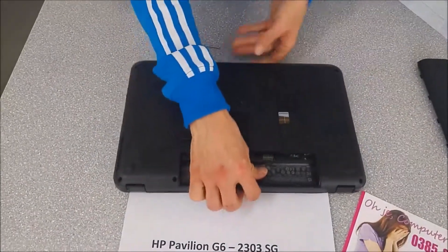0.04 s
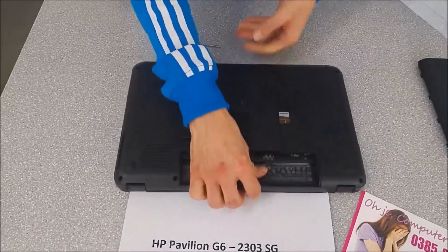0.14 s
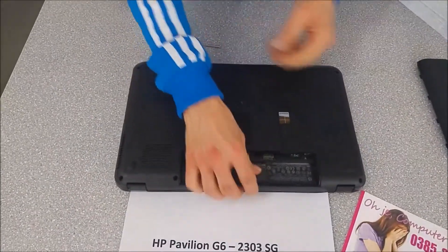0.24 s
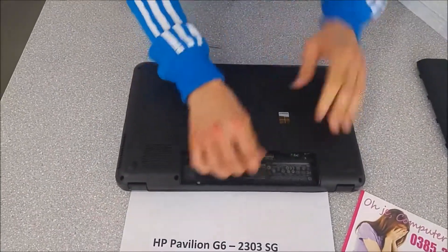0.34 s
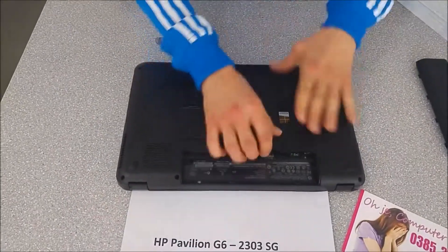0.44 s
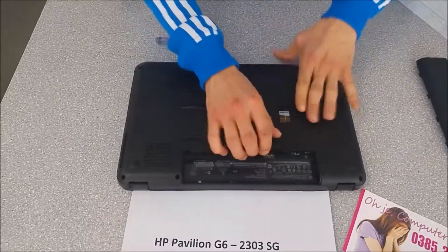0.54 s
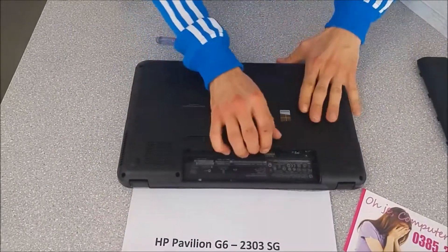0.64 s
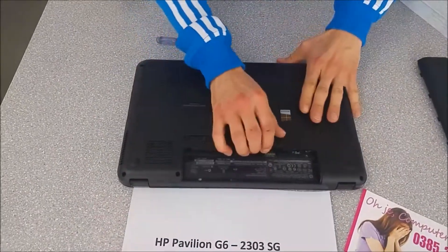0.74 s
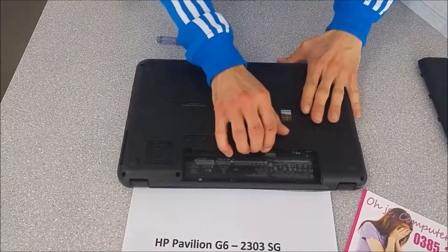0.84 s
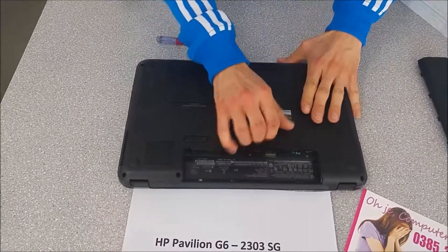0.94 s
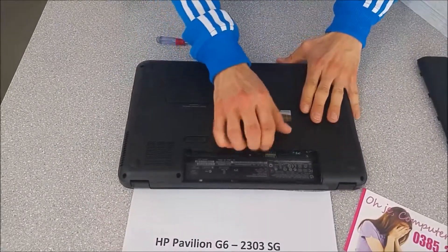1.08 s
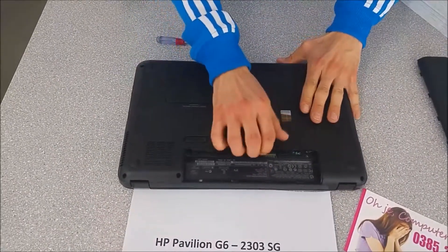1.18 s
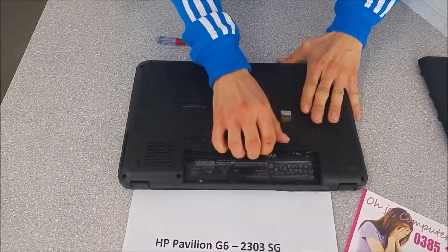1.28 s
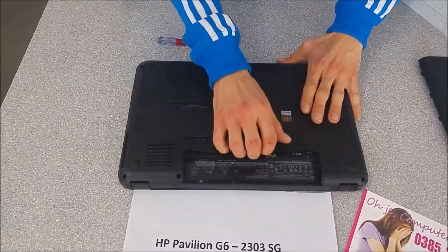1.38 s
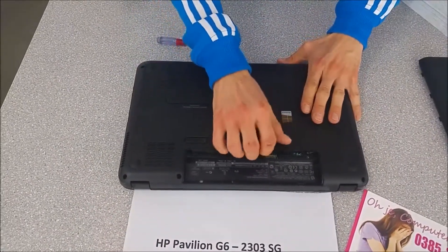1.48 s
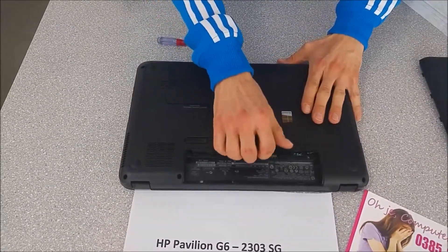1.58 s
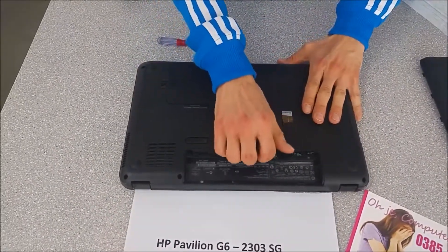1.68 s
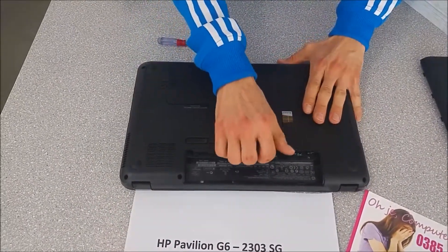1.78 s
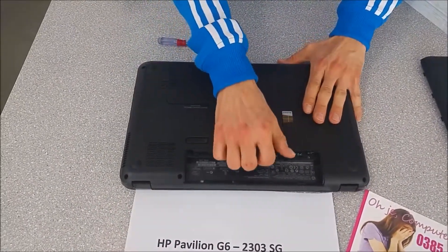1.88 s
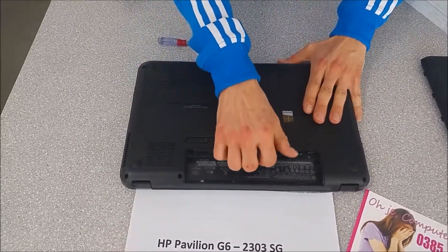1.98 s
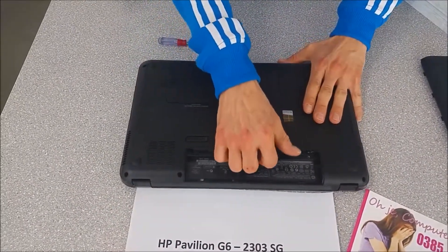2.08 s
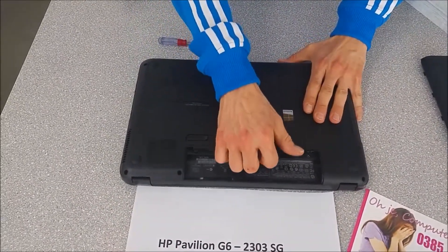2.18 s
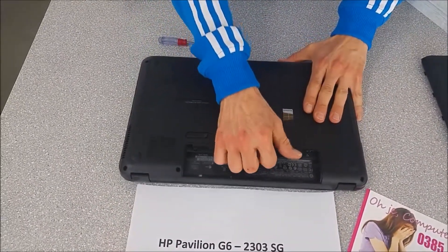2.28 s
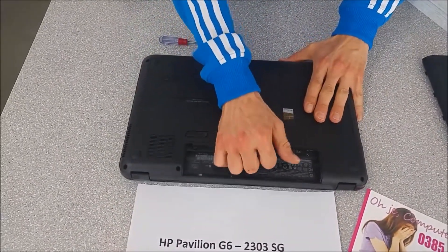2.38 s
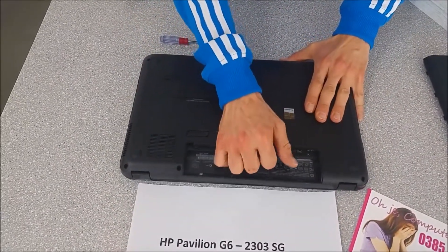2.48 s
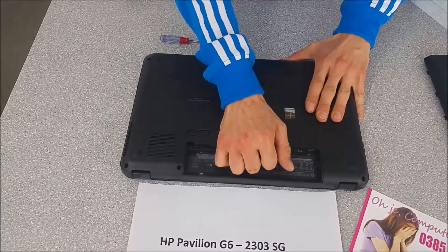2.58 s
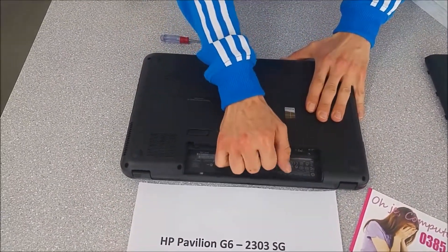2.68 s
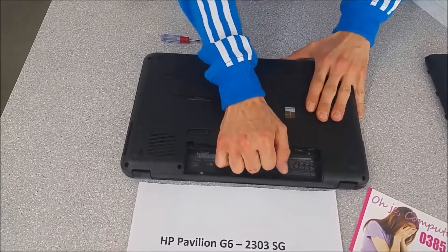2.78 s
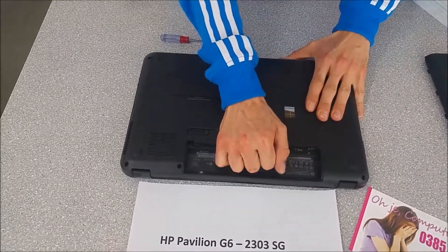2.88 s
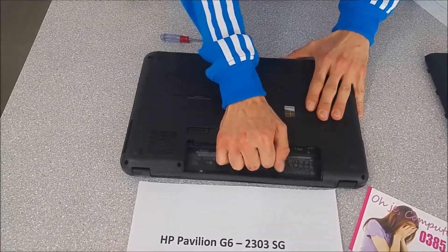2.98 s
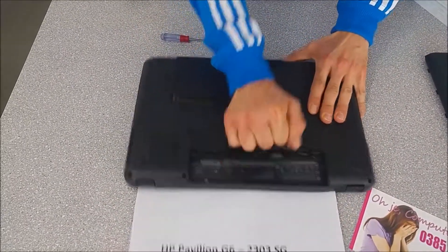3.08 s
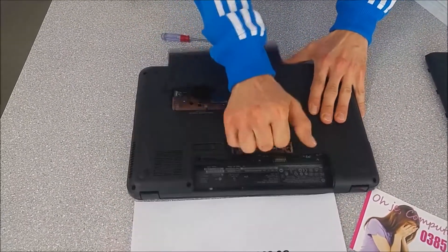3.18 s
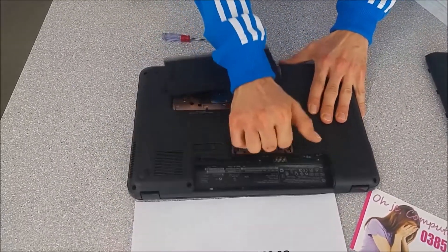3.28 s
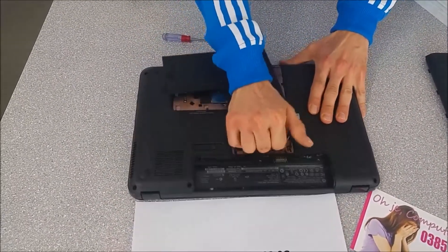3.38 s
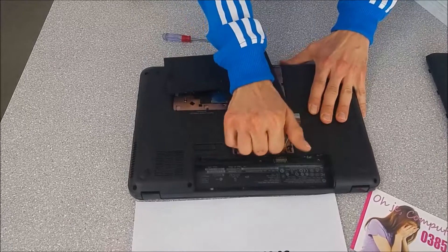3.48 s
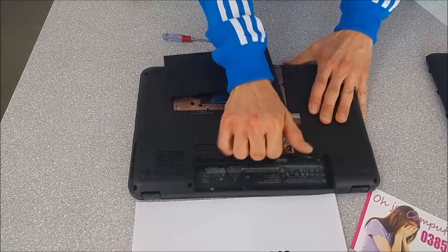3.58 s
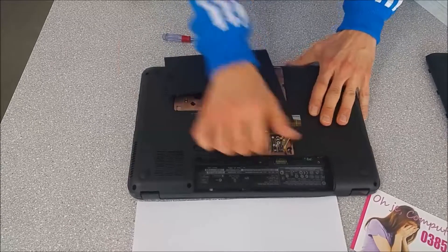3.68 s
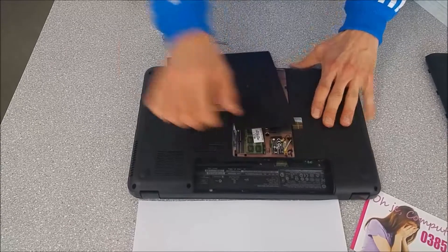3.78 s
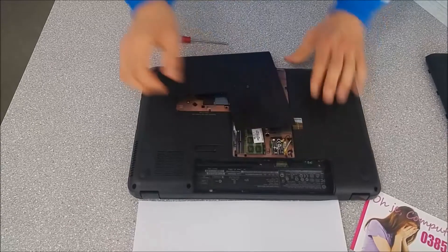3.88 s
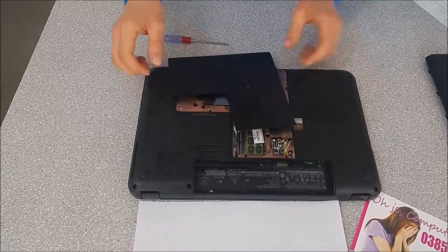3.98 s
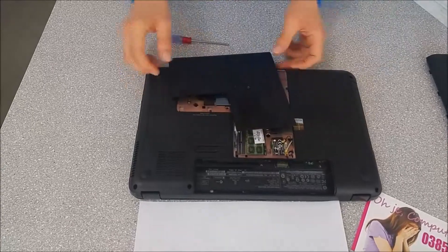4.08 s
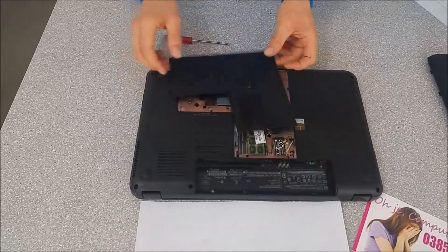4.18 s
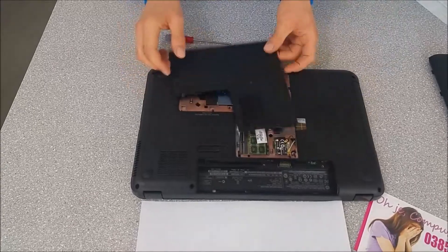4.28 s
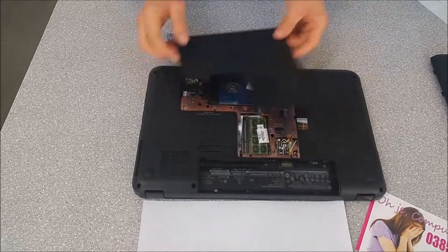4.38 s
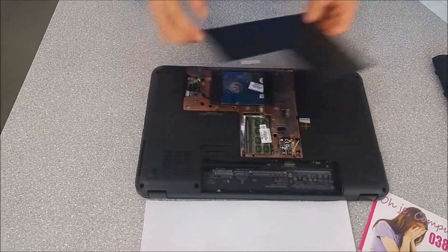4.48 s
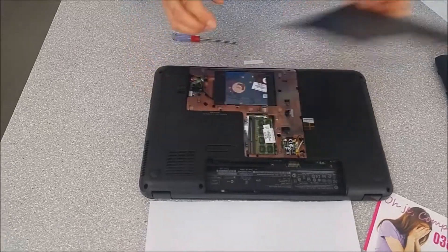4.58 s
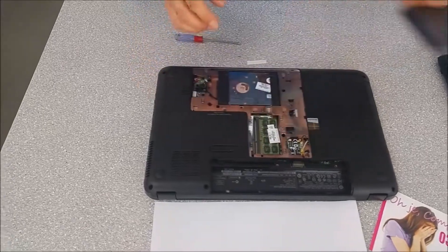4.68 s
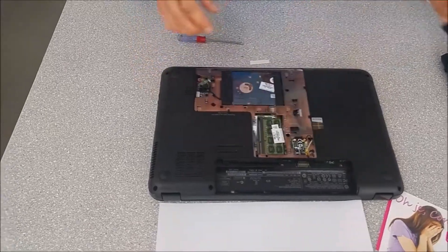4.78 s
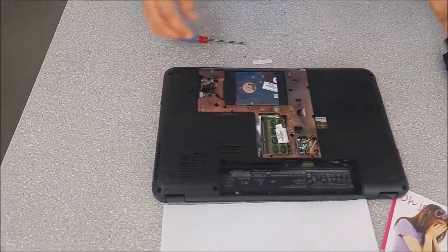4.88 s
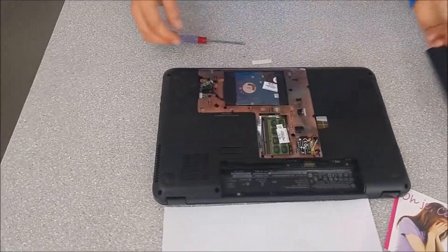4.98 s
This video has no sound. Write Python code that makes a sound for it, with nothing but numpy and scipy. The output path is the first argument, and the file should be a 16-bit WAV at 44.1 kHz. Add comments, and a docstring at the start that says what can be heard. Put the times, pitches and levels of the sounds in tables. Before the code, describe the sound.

In a small room, a close stereo microphone hears a laptop handled on a workbench, over steady low noise and thin, bright electrical ticks on the left only. At 0.04 and 0.2 s the plastic case bumps down with hard, hollow knocks and a low bench boom, with a brief scrape. Faint contacts follow, then at 1.03-1.1 s a cluster of plastic clacks and rubbing fingers. Small dry clicks and scratches continue to 1.9 s; a sharper snap comes at 2.02 s, then soft rubbing and a tiny airy slip near 2.4 s. From 2.77 s gritty clip clicks quicken, with a short strained groan. At 3.12-3.27 s the cover cracks open in a very loud, saturated burst with thumps, rattling out by 3.5 s. At 3.65-3.9 s the loose cover rasps across the case; light clicks come at 4.13 and 4.31 s, then only noise and ticks.

```python
"""Prying the cover off a laptop

A laptop lies upside down on a workbench. Hands bump it and fingernails pry at its plastic service cover;
clips click, let go in one loud cracking burst, and the loose cover rattles and drags over the case.
Contacts are noise bursts plus struck modes; sliding is noise under hand pressure; a groan is one narrow mode.
A small room answers, over steady noise and electrical ticks on the left; the input saturates on the crack.
"""
import sys
import numpy as np
from scipy import signal
from scipy.fft import rfft, irfft, next_fast_len
from scipy.io import wavfile

SR = 44100
rng = np.random.default_rng(int(sys.argv[2]) if len(sys.argv) > 2 else 0)


def int16_out(signal):
    """Quantize to a 16-bit WAV file."""
    q = np.round(np.clip(np.atleast_2d(signal).T, -1, 1) * 32767)
    wavfile.write(sys.argv[1], SR, q.astype(np.int16))


N = 222392  # samples

# modes of the cover: mode_hz, level_db, t60_s
COVER_MODES = [(507, -2, 0.012), (639.3, -1, 0.11), (685, 7.5, 0.052), (754.6, 0.5, 0.064), (995, 5, 0.049),
               (1130, 2.5, 0.063), (1232, 8.5, 0.027), (1433.4, 1.5, 0.072), (1538, 5, 0.027),
               (1899, 2, 0.052)]
# relative spectrum of cracking plastic: freq_hz, density_db
CRACK_SPECTRUM = [(100, -23), (500, -0.5), (1800, -0.5), (2800, -6), (3800, -2.5), (5500, -3), (6500, 5),
                  (7300, 4), (8300, -2), (11000, -11.5), (16000, -13.5)]
# relative spectrum of plastic rubbing: freq_hz, density_db
RUB_SPECTRUM = [(460, -8.5), (660, 7), (1150, 1.5), (2100, -16), (4800, -15), (6700, -10.5), (8800, -18.5),
                (16000, -53)]
# relative spectrum of the strained clip, with its resonances: freq_hz, density_db
CLIP_SPECTRUM = [(200, -12.5), (900, 0.5), (1400, 9), (1880, -0.5), (2450, -24.5), (3300, -6), (4700, 0),
                 (6000, -9.5), (8500, -9), (16000, -33)]
# fingers and cover sliding on the case, before the trim in sliding():
# start_s, length_s, start_level_db, pressure_gain_db (over the stroke), skip_level_db (relative to pressure)
STROKES = [(0.01, 0.088, -26, -11.5, -5.5), (1, 0.17, -41.5, 5.5, -8), (1.209, 0.018, -41, -2.5, -4.5),
           (1.244, 0.07, -38, -3.5, -6), (1.434, 0.014, -36, -4, -6), (1.596, 0.023, -49, 0, -4),
           (2.17, 0.31, -51, 8.5, -15), (3.039, 0.051, -44, 8, -9), (3.44, 0.064, -31, -6, -2.5),
           (4.146, 0.026, -37, -1, -11), (4.233, 0.098, -62.5, 24.5, -7)]


def amp(db):
    """Decibels to gain."""
    return 10 ** (np.asarray(db) / 20)


def unit(x):
    """Scale to rms 1 over all channels."""
    return x / np.sqrt(np.mean(x ** 2) + 1e-20)


def fade(t, t60):
    """Exponential decay by 60 dB in t60 seconds."""
    return np.exp(-np.log(1000) * t / t60)


def along(points, hz):
    """Interpolate (Hz, value) points on a log frequency axis."""
    point_hz, values = np.transpose(points)
    return np.interp(np.log(hz + 1), np.log(point_hz + 1), values)


def add(track, start_s, sound):
    """Mix a sound into a track in place, cut at the track's end."""
    part = track[..., max(round(start_s * SR), 0):][..., :sound.shape[-1]]
    part += sound[..., :part.shape[-1]]


def filtered(x, response):
    """Multiply the spectrum of x by a response of frequency."""
    size = x.shape[-1]
    padded = next_fast_len(size + SR // 20)
    spectrum = rfft(x, padded) * response(np.fft.rfftfreq(padded, 1 / SR))
    return irfft(spectrum, padded)[..., :size]


def noise(spectrum, size):
    """Coloured stereo noise of rms 1 whose left-right likeness depends on frequency."""
    # freq_hz, likeness (correlation, 0-1)
    likeness = [(250, 0.14), (600, 0.81), (1200, 0.11), (2500, 0.017), (8000, 0.062)]

    def mid_side(hz):
        angle = np.arccos(np.clip(along(likeness, hz), -1, 1)) / 2
        return amp(along(spectrum, hz)) * np.array([np.cos(angle), np.sin(angle)])

    mid, side = filtered(rng.standard_normal((2, size)), mid_side)
    return unit(np.array([mid + side, mid - side]))


def causal(spectrum, size=512):
    """Minimum-phase impulse response of a spectrum: the most compact causal one."""
    log_gain = np.log(amp(along(spectrum, np.fft.rfftfreq(size, 1 / SR))))
    cepstrum = irfft(log_gain)
    cepstrum[1:size // 2] *= 2
    cepstrum[size // 2 + 1:] = 0
    return irfft(np.exp(rfft(cepstrum)))


def ring(modes, t, centre_hz, focus_db_per_octave, scatter_db, detune, spread_rad):
    """Decaying modes, strongest near the centre; each shifts in pitch and differs in phase between channels."""
    hz, db, t60 = np.transpose(modes)[:, :, None]
    size, shift, offset = rng.standard_normal((3, len(modes), 1))
    phase = 2 * np.pi * (hz * (1 + detune * shift) * t + rng.random((len(modes), 1)))
    octaves_off = np.abs(np.log2(hz / centre_hz))
    swing = amp(db - focus_db_per_octave * octaves_off + scatter_db * size) * fade(t, t60)
    return np.array([(swing * np.sin(phase + side * spread_rad * offset)).sum(0) for side in (-1, 1)])


def struck(x, t, rise_s, level_samples):
    """Give a sound its attack; its first level_samples get rms 1."""
    x = x * (1 - np.exp(-t / rise_s))
    return x / np.sqrt(np.mean(x[:, :level_samples] ** 2))


def noise_floor(level_db=-53.5):
    """Steady coloured background noise."""
    # freq_hz, density_db (relative)
    floor_spectrum = [(25, -16), (70, 1), (360, 3), (500, -9), (700, 3.5), (1150, -9), (1550, -5),
                      (2500, -14.5), (5300, -16.5), (6400, -11), (7400, -6), (8200, -19), (16000, -21.5)]
    return amp(level_db) * noise(floor_spectrum, N)


def ticks(strong_peak_db=-18.5, weak_peak_db=-28, weak_per_s=2.7):
    """Electrical spikes of one shape, left channel only, no room; the weak ones fall at random."""
    # start_s
    strong_times = [0.1117, 0.3167, 0.4189, 0.4802, 0.5213, 0.6238, 0.6903, 0.8287, 0.9005, 0.9953, 1.238,
                    1.313, 2.1586, 2.262, 2.3646, 2.467, 2.774, 2.8762, 2.9783, 3.0814, 3.7978, 4.0028,
                    4.1046, 4.2076, 4.2603, 4.4131, 4.4704, 4.5143, 4.6176, 4.68, 4.7202, 4.822, 4.9248,
                    5.0267]
    # freq_hz, density_db (relative)
    tick_spectrum = [(3200, -30), (5000, -22), (6200, -11.5), (7150, 4.5), (7800, -9), (8300, -2),
                     (9700, -12), (14800, -20.5), (16500, -28.5)]
    out, spike = np.zeros((2, N)), causal(tick_spectrum)
    spike = spike / np.abs(spike).max()
    weak_times = rng.random(int(weak_per_s * N / SR)) * N / SR
    for times, peak_db in ((strong_times, strong_peak_db), (weak_times, weak_peak_db)):
        for start_s in times:
            add(out[0], start_s, amp(peak_db) * spike)
    return out


def room(x, build_s=0.0013):
    """Diffuse tail that builds up quickly; each frequency decays at its own rate."""
    # freq_hz, t60_s
    decay_times = [(150, 0.54), (800, 0.23), (7000, 0.24), (15000, 0.15)]
    source = noise([(100, 0.019), (16000, 0.024)], SR // 2)  # nearly white
    hz, t, frames = signal.stft(source, SR, nperseg=256)
    frames = frames * fade(t, along(decay_times, hz)[:, None])
    tail = signal.istft(frames, SR, nperseg=256)[1]
    tail_t = np.arange(tail.shape[1]) / SR
    tail = tail * (1 - np.exp(-(tail_t / build_s) ** 2))
    return signal.fftconvolve(x, tail / np.linalg.norm(tail[0]), axes=1)[:, :N]


def groan(mode_hz=678, half_width_hz=30):
    """The bent cover sounds in its main mode while strained or dragged: narrow-band noise."""
    # start_s, length_s, level_db (before the swell)
    groan_events = [(3.043, 0.078, -38.5), (3.655, 0.3, -47.5)]
    out = np.zeros((2, N))
    for start_s, length_s, db in groan_events:
        t = np.arange(round(length_s * SR)) / SR
        tone = filtered(noise(RUB_SPECTRUM, len(t)), lambda hz: 1 / (1 + ((hz - mode_hz) / half_width_hz) ** 2))
        swell = np.sqrt(np.sin(np.pi * t / length_s))
        add(out, start_s, amp(db) * unit(tone) * swell)
    return out


def swish(start_s=2.36, length_s=0.105, start_db=-65, swell_db=12):
    """A fingertip loses its grip: an airy hiss that swells until it slips off."""
    out, progress = np.zeros((2, N)), np.linspace(0, 1, round(length_s * SR))
    add(out, start_s, amp(start_db + swell_db * progress) * noise(CRACK_SPECTRUM, len(progress)))
    return out


def bench(rise_s=0.0062):
    """The bench top booms in two low modes when the laptop lands on it."""
    # start_s, level_db
    landings = [(0.0376, -29.5), (0.157, -39), (0.196, -22)]
    # mode_hz, level_db, t60_s
    bench_modes = [(125, 0, 0.29), (176, 1.5, 0.19)]
    out, t = np.zeros((2, N)), np.arange(SR // 2) / SR
    boom = sum(amp(db) * np.sin(2 * np.pi * hz * t) * fade(t, t60) for hz, db, t60 in bench_modes)
    for start_s, db in landings:
        add(out, start_s, amp(db) * boom * (1 - np.exp(-t / rise_s)))
    return out


def thumps(trim_db=-1, push_db=6, push_t60_s=0.014, thud_db=-13, thud_t60_s=0.23):
    """A hard blow gives the case one short push, a dull thud and a few low modes."""
    # start_s, level_db (before trim_db), centre_hz
    blows = [(0.0384, -25.5, 281), (0.196, -24, 200), (1.098, -35.5, 390), (3.117, -18.5, 224),
             (3.134, -29, 45), (3.157, -25.5, 386), (3.199, -19.5, 376), (3.211, -26, 395),
             (3.273, -27.5, 286), (3.365, -32, 292)]
    # mode_hz, level_db, t60_s
    case_modes = [(70.3, -14.5, 0.12), (328, 2.5, 0.05), (393, 3.5, 0.091), (461.4, 5.5, 0.13)]
    out, t = np.zeros((2, N)), np.arange(SR // 2) / SR
    for start_s, db, centre_hz in blows:
        body = ring(case_modes, t, centre_hz, focus_db_per_octave=14.5, scatter_db=1.5,
                    detune=0.02, spread_rad=0.49)
        thud_spectrum = [(20, -10), (centre_hz, 0), (2 * centre_hz, -2), (1500, -30)]
        thud = noise(thud_spectrum, len(t)) * fade(t, thud_t60_s)
        push = amp(push_db) * np.sin(2 * np.pi * centre_hz * t) * fade(t, push_t60_s)
        blow = struck(body / 2 + push + amp(thud_db) * thud, t, rise_s=0.0022, level_samples=700)
        add(out, start_s, amp(db + trim_db) * blow)
    return out


def pressure(resting_db=-63, attack_s=0.003, release_t60_s=0.1):
    """Each stroke grips quickly, presses harder or eases off, then dies away to the resting hands."""
    total = np.full(N, amp(resting_db))
    for start_s, length_s, db, gain_db, _ in STROKES:
        t = np.maximum(np.arange(N) / SR - start_s, 0)
        grip = np.minimum(t / attack_s, 1)
        push = amp(db + gain_db * np.minimum(t / length_s, 1))
        release = fade(np.maximum(t - length_s, 0), release_t60_s)
        total = np.maximum(total, grip * push * release)
    return total


def sliding(trim_db=-3.5, slips_per_s=380, slip_t60_s=0.013, size_spread_db=3):
    """Plastic sticks and slips in tiny steps of uneven size, each a short scratch."""
    slips = (rng.random(N) < slips_per_s / SR) * amp(size_spread_db * rng.standard_normal(N))
    decay = fade(np.arange(SR // 20) / SR, slip_t60_s)
    power = np.abs(signal.fftconvolve(slips ** 2, decay ** 2)[:N])
    scratches = unit(noise(RUB_SPECTRUM, N) * np.sqrt(power))
    return amp(trim_db) * pressure() * scratches


def skips(skips_per_s=110, size_spread_db=2.0, centre_hz=1450, grit_db=-6, grit_t60_s=0.013):
    """A hard edge skips as it slides: tiny taps, scaled by stroke pressure, ring the cover."""
    out, t, press = np.zeros((2, N)), np.arange(SR // 16) / SR, pressure()
    for start_s, length_s, _, _, skip_db in STROKES:
        for tap_s in start_s + length_s * rng.random(int(length_s * skips_per_s)):
            modes = ring(COVER_MODES, t, centre_hz, focus_db_per_octave=7.5, scatter_db=7.0,
                         detune=0.043, spread_rad=0.49)
            cover = struck(modes, t, rise_s=0.0002, level_samples=300)
            grit = noise(CLIP_SPECTRUM, len(t)) * fade(t, grit_t60_s)
            grit = struck(grit, t, rise_s=0.0001, level_samples=130)
            gain = press[round(tap_s * SR)] * amp(skip_db + size_spread_db * rng.standard_normal())
            add(out, tap_s, gain * (cover + amp(grit_db) * grit))
    return out


def drag(slips_per_s=125, ease_db=-3, slip_t60_s=0.04, break_away_db=4):
    """The loose cover's edge breaks away with a click, then catches and slips unevenly: an easing rasp."""
    # start_s, length_s, level_db
    drag_events = [(3.673, 0.036, -37), (3.722, 0.064, -41), (3.806, 0.006, -42), (3.8192, 0.03, -36),
                   (3.888, 0.021, -44)]
    # cover scraping on its edge: freq_hz, density_db (relative)
    scrape_spectrum = [(450, -16), (670, -4.5), (1150, 6), (1830, -5), (2250, -15.5), (4500, -21.5),
                       (7000, -10.5), (12000, -38)]
    out, t = np.zeros((2, N)), np.arange(SR // 16) / SR
    for start_s, length_s, db in drag_events:
        gaps_s = (0.5 + rng.random(int(length_s * slips_per_s) + 1)) / slips_per_s
        for offset_s in np.cumsum(gaps_s) - gaps_s:  # first slip at 0
            slip = noise(scrape_spectrum, len(t)) * fade(t, slip_t60_s)
            slip = struck(slip, t, rise_s=0.00027, level_samples=300)
            slip_db = db + ease_db * offset_s / length_s + rng.standard_normal()
            slip_db += break_away_db * (offset_s == 0)
            add(out, start_s + offset_s, amp(slip_db) * slip)
    return out


def clip_slips(t60_s=0.027):
    """A strained clip slips: its small stiff hook gives a bright, gritty click that dies in milliseconds."""
    # start_s, level_db
    slip_events = [(0.544, -30.5), (1.274, -36), (1.3215, -29), (1.543, -40.5), (1.801, -45), (2.571, -42),
                   (2.774, -40), (2.8397, -30), (2.9338, -27.5), (2.961, -36), (3.033, -26.5),
                   (3.0614, -29), (3.088, -27), (3.4438, -32)]
    out, t = np.zeros((2, N)), np.arange(SR // 12) / SR
    for start_s, db in slip_events:
        click = noise(CLIP_SPECTRUM, len(t)) * fade(t, t60_s)
        add(out, start_s, amp(db) * struck(click, t, rise_s=0.0001, level_samples=130))
    return out


def snaps(crack_t60_s=0.029, linger=0.23, chatter_db=-17, chatter_t60_s=0.14,
          spot_db=8, spot_t60_s=0.021, sag_octaves_per_s=35):
    """Plastic contacts and clips letting go: a crack, a chatter of nearby parts and the ring of the cover."""
    # start_s, crack_level_db, ring_level_db, ring_centre_hz
    snap_events = [(0.0361, -18, -15, 870), (0.157, -35.5, -27.5, 720), (0.194, -14, -12, 862),
                   (0.209, -18, -19, 940), (0.543, -36.5, -38, 885), (0.7, -41, -43, 850),
                   (1.026, -33, -25.5, 845), (1.055, -30.5, -25.5, 993), (1.066, -26, -29, 915),
                   (1.078, -17, -21, 1270), (1.098, -36, -20, 710), (1.294, -51, -31.5, 900),
                   (1.32, -38, -34.5, 1010), (1.421, -35, -38, 1210), (1.831, -43, -35, 886),
                   (1.891, -48.5, -40, 884), (1.971, -44, -29, 726), (1.982, -37, -27.5, 806),
                   (2.02, -23.5, -32.5, 1180), (2.029, -29.5, -28, 1100), (2.099, -37.5, -39.5, 1100),
                   (2.455, -38, -34, 679), (3.115, -6.5, -13, 720), (3.1281, -5.5, -9.5, 1190),
                   (3.154, -6.5, -10, 1150), (3.1916, -4.5, -12, 1046), (3.199, -18, -15, 730),
                   (3.204, -9, -9.5, 740), (3.2135, -11, -15, 1110), (3.2643, -13, -13, 865),
                   (3.273, -18, -27, 1500), (3.3533, -21.5, -27, 1190), (3.365, -21.5, -23.5, 930),
                   (3.4445, -38, -29, 1290), (3.456, -25, -28.5, 1210), (3.4929, -31, -34, 976),
                   (3.648, -35, -42.5, 1076), (4.134, -38.5, -37.5, 875), (4.3114, -24.5, -42, 1200),
                   (4.316, -26, -29.5, 1030)]
    out, t = np.zeros((2, N)), np.arange(SR // 6) / SR
    for start_s, crack_db, ring_db, centre_hz in snap_events:
        # the harder the snap, the longer the crack decays; crack_t60_s holds at -18.5 dB
        t60_s = crack_t60_s * amp(linger * (crack_db + 18.5))
        envelope = fade(t, t60_s) + amp(chatter_db) * fade(t, chatter_t60_s)
        burst = noise(CRACK_SPECTRUM, len(t)) * envelope
        add(out, start_s, amp(crack_db) * struck(burst, t, rise_s=0.00059, level_samples=176))
        # a stiff spot excites the high modes, a soft one the low modes
        cover = ring(COVER_MODES, t, centre_hz, focus_db_per_octave=12.0, scatter_db=2,
                     detune=0.038, spread_rad=0.28)
        cover = struck(cover, t, rise_s=0.0017, level_samples=300)
        # the hit spot flexes at its own pitch, which sags as the strain lets go
        turns = np.cumsum(centre_hz * 2 ** (-sag_octaves_per_s * t)) / SR
        spot = amp(spot_db) * np.sin(2 * np.pi * turns) * fade(t, spot_t60_s)
        plastic = struck(cover + spot, t, rise_s=0.00029, level_samples=300)
        add(out, start_s, amp(ring_db) * plastic)
    return out


def scene(room_db=-10.0, clip_room_db=-17):
    """The handled laptop and its room over steady noise and ticks; clip slips excite the room less."""
    laptop = groan() + swish() + bench() + thumps() + sliding() + skips() + drag() + snaps()
    clips = clip_slips()
    answer = room(amp(room_db) * laptop + amp(clip_room_db) * clips)
    return noise_floor() + ticks() + answer + laptop + clips


def record(dry, ceiling=0.85, top_hz=16200):
    """The input saturates towards its ceiling, then a steep low-pass cuts above top_hz."""
    clipped = dry / (1 + np.abs(dry / ceiling) ** 6) ** (1 / 6)
    return filtered(clipped, lambda hz: 1 / (1 + (hz / top_hz) ** 160))


dry = scene()
out = record(dry)
int16_out(out)
```